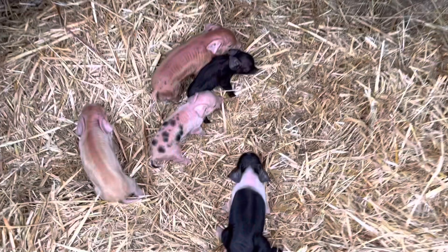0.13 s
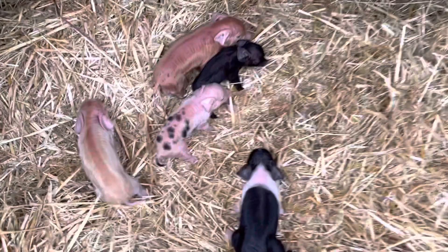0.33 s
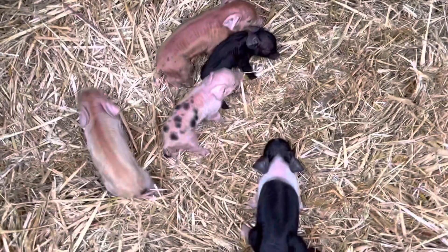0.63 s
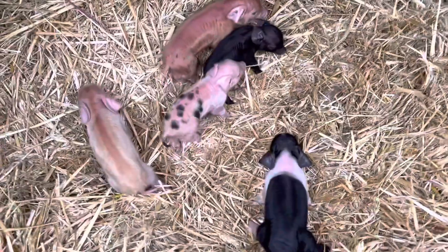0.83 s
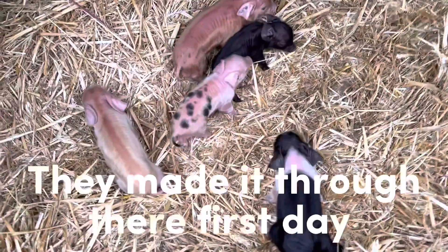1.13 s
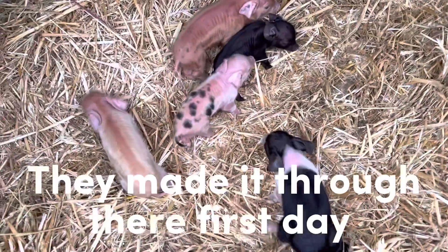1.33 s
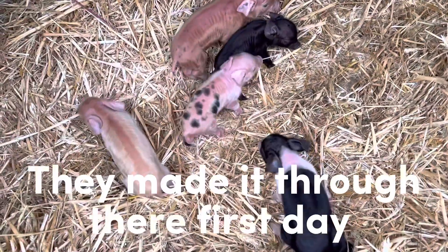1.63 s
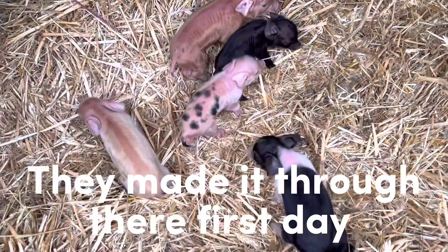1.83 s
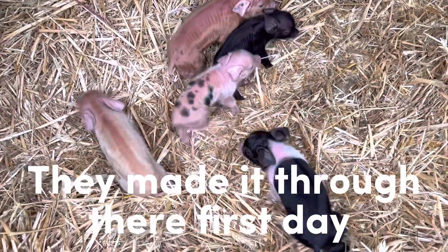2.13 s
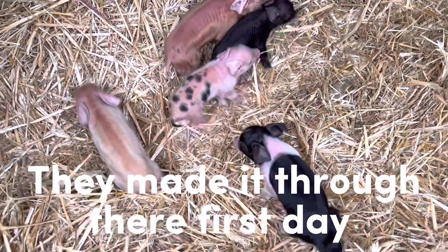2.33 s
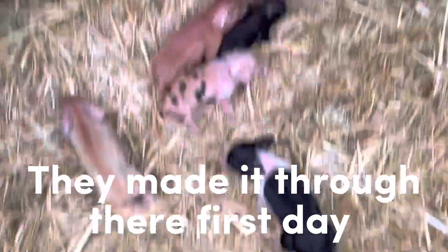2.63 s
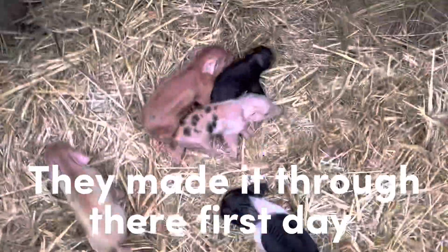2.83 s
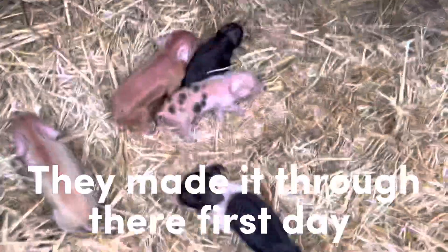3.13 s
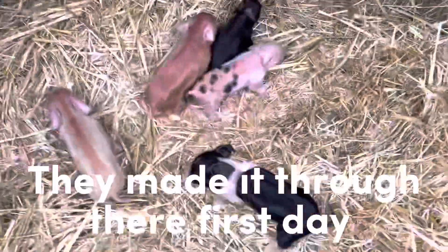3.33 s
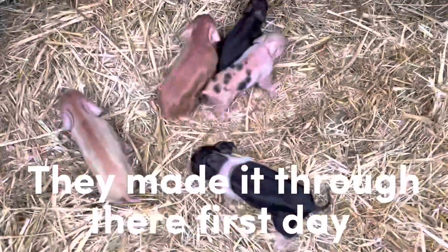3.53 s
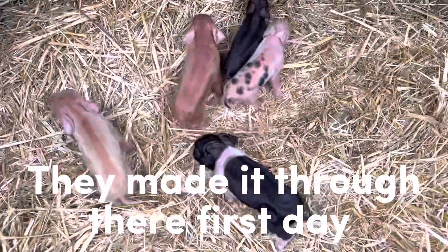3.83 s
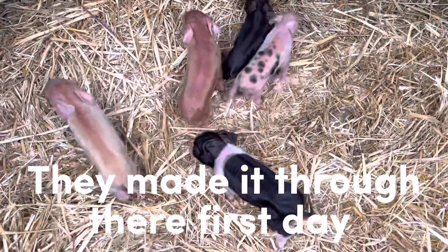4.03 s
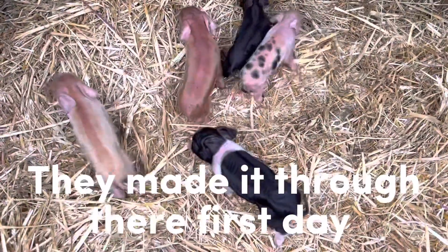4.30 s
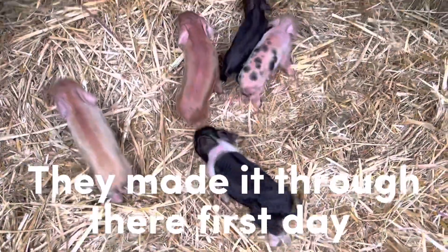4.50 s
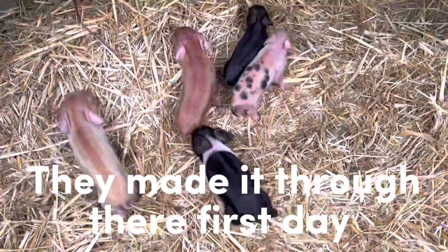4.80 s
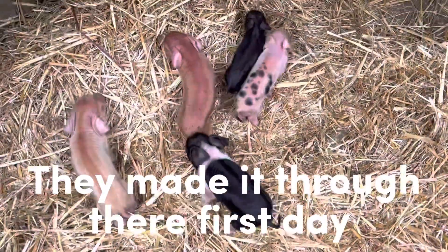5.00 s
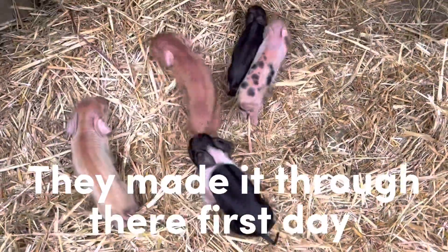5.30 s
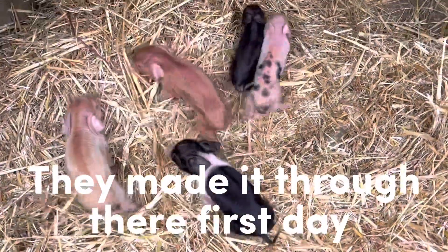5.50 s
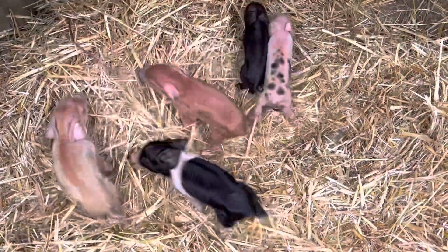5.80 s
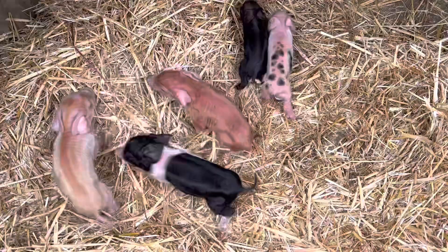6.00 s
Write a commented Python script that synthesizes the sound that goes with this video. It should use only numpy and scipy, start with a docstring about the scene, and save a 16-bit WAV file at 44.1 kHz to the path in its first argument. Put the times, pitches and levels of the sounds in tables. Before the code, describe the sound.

A short faint hiss and rustling straw, then a sow grunts in quick, low, rattling runs close by, with soft piglet hums.

```python
"""A brief thin hiss and softly rustling straw, then a sow grunts in quick runs, close by in a bedded shed. Each
grunt is a short rattle of slow, separate pulses that ring chest, throat, mouth and snout. Shaped noise makes
the breath and straw, narrow puffs the wet flecks of the lips and one straw tick, two harmonics a piglet's hum.
Short feedback echoes are the shed's answer; a two-port microphone hears it all, and the sound cuts out twice."""
import sys
import numpy as np
from scipy import signal
from scipy.fft import rfft, irfft, next_fast_len
from scipy.io import wavfile
from scipy.ndimage import uniform_filter1d

SR = 44100
rng = np.random.default_rng(int(sys.argv[2]) if len(sys.argv) > 2 else 0)


def digitize_waveform(pressure):
    """Quantize a signal to 16-bit integers and store it at the path in sys.argv[1].

    Rows of a 2-D input are taken as channels; values are limited to [-1, 1].
    """
    field = np.atleast_2d(pressure).T
    bounded = np.clip(field, -1, 1)
    quanta = np.round(bounded * 32767).astype(np.int16)
    wavfile.write(sys.argv[1], SR, quanta)


N = 271215
SIZE = next_fast_len(N + SR)
HZ = np.arange(SIZE // 2 + 1) * SR / SIZE + 1e-3   # FFT grid, kept above zero for its logarithm

# The sow's grunts: start_s, opening_db (snout at the first slap), slap_gap_s, length_s,
# swell_db (per slap), bend_per_s (drift of the mouth's resonances, as share), throat_db,
# mouth_hz, mouth_db, palate_hz, palate_db, nose_hz, nose_db, snout_hz, snout_db,
# chest_db, belly_db, breath_db (the last three are peaks of effort)
GRUNT_TABLE = [(0.321, -4.5, 0.026, 0.069, 4, -0.5, -40, 620, -50.5, 874, -36.5, 1133, -43, 2990, -62, -33, -34.5, -35.5),
               (0.563, -3, 0.025, 0.004, -6, 1, -45, 680, -58, 1180, -48, 1510, -66, 3580.0, -78, -42, -41, -66),
               (0.587, -1.5, 0.024, 0.08, 3.5, -0.05, -37, 820, -45, 1136, -34.5, 1940, -56.5, 3090, -58.5, -26, -28.5, -38),
               (0.682, -5, 0.025, 0.0027, 2.0, -1, -47, 860.0, -62, 1090, -51, 2100, -55, 3060, -53, -23.5, -47, -66),
               (0.83, -1.5, 0.025, 0.053, -4.5, 0.5, -43, 506, -54, 876, -47, 1927, -54.5, 2830, -57.5, -30, -37, -58),
               (0.917, -5.5, 0.0245, 0.066, 1.9, -0.64, -25, 860, -27.5, 930, -66, 1925, -57.5, 3090, -52.5, -24, -27, -38),
               (1.134, -5.5, 0.025, 0.0062, 0.0, -1.5, -39.5, 530.0, -68, 1200, -42, 1780, -51.5, 2630, -54, -31.5, -35, -68),
               (1.175, -17, 0.027, 0.11, 3.5, 1, -35, 555, -56.5, 973, -39, 1835, -61.5, 3110, -59, -26.5, -32.5, -36),
               (1.398, -2.5, 0.03, 0.004, 0.0, -1, -48, 910, -40.5, 1260, -34, 1630, -40.5, 2650, -47.5, -26, -36, -47),
               (1.453, -6, 0.027, 0.07, -1, 1.3, -19.5, 880, -36, 910, -27, 1880, -51, 3110, -45.5, -22.5, -32.5, -39.5),
               (1.631, -2, 0.037, 0.031, 1, -3, -24.5, 567, -47, 1120, -61, 1560.0, -68, 2640, -49, -25.5, -33, -73),
               (1.71, 2.5, 0.02, 0.06, 0, 0.5, -23.5, 800, -41, 1060, -38.5, 1860, -46.5, 3020, -48, -23.5, -35.5, -40),
               (1.849, -5, 0.022, 0.041, -18, 1.5, -31, 730, -68, 1350.0, -42, 1710, -45, 2710, -38, -25.5, -27.5, -42.5),
               (1.923, -12, 0.021, 0.078, -5.5, -2.5, -10, 664, -15, 1277, -18, 1580, -45, 3040, -32.5, -23, -37.5, -35),
               (2.167, -10, 0.028, 0.0037, 3, 7.5, -34, 516.0, -44, 1070, -52, 1650, -47, 2730, -45.5, -32.5, -37.5, -48),
               (2.198, -10, 0.029, 0.048, -3.5, 2, -20, 700, -28, 1115, -26.5, 2050, -50, 3290, -32.5, -22.5, -29.5, -39.5),
               (2.329, -6, 0.043, 0.027, 6, -1, -32, 710, -58, 1390, -37, 1500.0, -59, 2670, -34, -27, -28.5, -37.5),
               (2.386, -8, 0.026, 0.047, -4, -0.35, -5.5, 689, -6.5, 1266, -9, 1445, -27, 3050, -29, -25.5, -33, -36.5),
               (2.462, 0, 0.028, 0.0045, 0.0, 0, -21.5, 574, -30, 1220, -39, 1570.0, -55.0, 3040, -43, -31, -31, -42),
               (2.69, -5.5, 0.023, 0.12, -4.5, 2, -39.5, 616, -42, 940.0, -58, 1670, -71, 3180, -48.5, -45.5, -73, -50),
               (2.917, -3, 0.016, 0.057, 2, 14.5, -69, 618, -36.5, 870, -45, 2150, -53, 2780, -56, -45.5, -50.5, -41.5),
               (3.067, 2, 0.023, 0.035, -22, -0.5, -55, 560, -50, 1370, -64.0, 1580, -63, 3530.0, -68, -39.5, -52, -64),
               (3.211, -8, 0.015, 0.017, 8, -0.5, -82, 734, -65, 1210, -60, 1670, -52, 3020, -61.5, -60, -61, -79),
               (3.32, -0.5, 0.018, 0.013, 3, 4, -50, 496, -48, 1020, -42, 1430, -52, 2960, -47, -41.5, -57, -43),
               (3.397, -4.5, 0.027, 0.051, -4.5, -1, -20.5, 963, -26, 984, -24.5, 1970, -49, 3120, -54, -30, -34, -40),
               (3.448, -3, 0.026, 0.049, -8, -1.5, -21, 883, -29, 900, -27, 1670, -51, 3080, -40.5, -23, -29.5, -56),
               (3.666, -22, 0.023, 0.032, 0.5, 1.5, -29, 675, -35.5, 1030, -34, 1450, -37.5, 4070, -49, -30.5, -33.5, -62),
               (3.717, -3.5, 0.029, 0.053, -4.5, -0.5, -20.5, 715, -33.5, 1000, -24, 1316, -34, 3480, -43, -23.5, -30.5, -60),
               (3.849, 1, 0.025, 0.053, -6.5, -0.8, -27.5, 690, -40.5, 890, -36, 1550, -45, 2540.0, -69, -30.5, -33, -46),
               (4.149, -4.5, 0.029, 0.03, -24, -2, -33.5, 684, -38, 1340, -40, 1540, -45.5, 2720, -44, -33.5, -27, -45),
               (4.208, -3, 0.037, 0.058, 3.5, -0.8, -22, 735, -36, 1023, -32, 1880, -51.5, 3230, -48, -27.5, -27, -45),
               (4.267, -4, 0.023, 0.02, -4.5, -0.5, -25, 735, -30, 892, -26.5, 1820, -57, 3100, -35, -27, -27.5, -59),
               (4.478, -2.5, 0.025, 0.024, -19, -2.5, -47.5, 755, -46.5, 1040, -50, 1890, -56, 2500, -47, -29.5, -33.5, -50),
               (4.544, -21, 0.025, 0.068, -5, 0.8, -14.5, 730, -30, 1007, -20.5, 1880, -38, 3180, -29, -22, -28, -38.5),
               (4.752, -5, 0.023, 0.064, -1.5, -0.7, -42.5, 747, -42.5, 950.0, -51, 1645, -56.5, 2530, -60, -50, -52, -52),
               (5.117, -36, 0.027, 0.048, 5, -0.5, -22, 825, -41.5, 1020, -33.5, 2280, -63, 3480, -80, -33.5, -32, -46),
               (5.195, -9.5, 0.02, 0.037, -6, -0.8, -15, 870, -27, 1080, -21.5, 2000, -39.5, 3290, -29, -20.5, -22, -33.5),
               (5.353, -1.5, 0.024, 0.045, -0.5, 0.5, -23, 890, -31, 920, -33.5, 1910.0, -71, 3230, -40, -27, -32, -52),
               (5.502, -6, 0.026, 0.047, 4, 1, -25, 693, -38.5, 1134, -32, 1590, -47.5, 3100, -40, -23, -31.5, -55),
               (5.656, -6, 0.039, 0.0083, 0.0, -3.5, -40, 860, -40, 950, -48, 1660, -42, 2960, -48, -24, -30, -59),
               (5.746, -8.5, 0.018, 0.0049, -2, 0, -72, 905, -35, 1340, -42, 1900, -37, 2800, -32, -47, -36, -40),
               (5.777, -5, 0.039, 0.028, -26, -1, -26.5, 533, -28.5, 1196, -35.5, 1760, -33, 2690, -28.5, -21.5, -28, -37.5),
               (5.849, -3, 0.022, 0.044, -17, -1.5, -20.5, 867, -27, 1150, -29.5, 1750.0, -66, 3700, -45, -27, -30, -50),
               (5.989, -8.5, 0.052, 0.0059, 0.0, -1, -27, 885, -30, 1160, -26, 1740, -31, 2700, -36, -27, -27.5, -46.5),
               (6.044, -12, 0.029, 0.042, -4, 0.7, -21.5, 830, -30.5, 1147, -28, 1936, -39.5, 3170, -35, -21.5, -30, -38)]


def from_db(db):
    """Gain of a level in dB."""
    return 10 ** (np.asarray(db) / 20)


def power_sum(*levels_db):
    """Level of unrelated sounds heard together."""
    return 10 * np.log10(sum(from_db(db) ** 2 for db in levels_db))


def rms_one(x):
    """Scaled to rms 1."""
    return x / np.sqrt(np.mean(x ** 2) + 1e-20)


def in_time(rows):
    """Columns of a curve table, drawn as straight lines through every sample."""
    time_s, *columns = np.transpose(rows)
    return [np.interp(np.arange(N) / SR, time_s, column) for column in columns]


def at_hz(points):
    """A spectrum table on the FFT grid, straight over log frequency."""
    hz, values = np.transpose(points)
    return np.interp(np.log(HZ), np.log(hz), values)


def drift(rate_hz):
    """Slow chance of spread 1: noise through two equal one-pole lowpasses, drawn every 40 samples."""
    r = np.exp(-80 * np.pi * rate_hz / SR)
    noise = rng.standard_normal(N // 40 + 2002)
    slow = signal.lfilter([1], [1, -2 * r, r * r], noise)[2000:]
    return np.interp(np.arange(N) / 40, np.arange(len(slow)), rms_one(slow))


def ring(x, modes):
    """Parallel decaying modes of alternating sign; a unit click rings each at its own level."""
    out = 0
    for k, (hz, width_hz, level_db) in enumerate(modes):
        r, w = np.exp(-np.pi * width_hz / SR), 2 * np.pi * hz / SR
        mode = signal.lfilter([0, np.sin(w)], [1, -2 * r * np.cos(w), r * r], x + 1e-18)
        out = out + (-1) ** k * from_db(level_db) * mode
    return out


def cavity(x, hz, width_hz, level_db):
    """A resonance passed twice: soft onset, dark valleys on both sides."""
    r, w = np.exp(-np.pi * width_hz / SR), 2 * np.pi * hz / SR
    once = ring(x, [(hz, width_hz, level_db)])
    band = [(1 - r * r) / 2, 0, (r * r - 1) / 2]
    return np.e * signal.lfilter(band, [1, -2 * r * np.cos(w), r * r], once)


def at_ports(common, own, colour=1):
    """A common part reaches both ports with a phase lead between them; an own part fills the rest."""
    # phase between the ports: pitch_hz, left_lead_rad
    port_lead = [(0, 0), (340, -.65), (600, -2.1), (860, -2.9), (1400, -3.8), (1700, -.6), (2200, -.4),
                 (3100, -2.9), (3700, -.3), (4500, -.6), (5200, -3), (5600, 0), (7600, 0), (12000, -3.14),
                 (16000, -3.14)]
    # diffuse sound shared by the ports: pitch_hz, common_share (of power)
    port_alike = [(100, .999), (300, .96), (700, .8), (1100, .6), (2000, .45), (3500, .35), (5000, .3),
                  (5700, .998), (7700, .998), (8400, .65), (11300, .6), (12100, .997)]
    # balance of the ports: pitch_hz, left_minus_right_db
    port_tilt = [(230, 3), (380, 0.5), (750, -1), (900, 0.5), (1350, -9), (2000, 1.5), (2600, -2),
                 (4500, 2), (5500, -0.5)]
    lead = np.exp(.5j * np.interp(HZ, *np.transpose(port_lead)))
    both = rfft(common, SIZE) * np.array([lead, 1 / lead])
    alike = np.clip(at_hz(port_alike), 0, 1)
    mix = np.sqrt(alike) * both + np.sqrt(1 - alike) * rfft(own, SIZE)
    balance = from_db(at_hz(port_tilt) * [[.5], [-.5]])
    return irfft(colour * balance * mix, SIZE)[:, :N]


def far_hiss():
    """Noise in one band around four kilohertz, apart at each port: it swells in, then sinks to a trace."""
    # level of the hiss: time_s, level_db
    hiss_curve = [(.04, -98), (.06, -54), (.2, -59), (.3, -72)]
    band = cavity(rng.standard_normal((2, N)), 4280, 1300, 0)
    return from_db(in_time(hiss_curve)[0]) * rms_one(band)


def shed(x):
    """Eight feedback echoes for each of three listening points, duller at every bounce."""
    t60_s, level_db, wall_cut_hz = 0.16, -4.5, 2160   # t60 holds for the lows
    lags_s = rng.uniform(0.0091, 0.033, (3, 8, 1))
    dull = 1 + (HZ / wall_cut_hz) ** 2
    wet = np.zeros((3, len(HZ)), complex)
    for k in range(8):
        lag_s = lags_s[:, k]
        loop = from_db(-60 * lag_s * dull / t60_s) * np.exp(-2j * np.pi * HZ * lag_s)
        wet += (-1) ** k * loop / (1 - loop)
    return from_db(level_db) * irfft(wet * rfft(x, SIZE), SIZE)[:, :N]


def straw(level_db, per_s, cycles):
    """Dry stalks snap and tick at random, each ringing for a few cycles at one of fourteen pitches."""
    sizes = from_db(4.2 * np.minimum(rng.exponential(1, N), 4)) * rng.choice([-1, 1], N)
    born = rng.random(N) < per_s / SR
    dealt = rng.integers(0, 14, N)   # which pitch a stalk gets
    ticks = 0
    for k, hz in enumerate(np.geomspace(3300, 8500, 14)):
        ticks = ticks + ring(sizes * born * (dealt == k), [(hz, hz / cycles, 0)])
    return from_db(level_db) * rms_one(at_ports(ticks, [ticks, -np.roll(ticks, 30)]))


def swishes():
    """Low, rustle and hiss level: each swish of straw rises and falls at a steady rate in dB."""
    # swishes of straw: peak_s, low_db, rustle_db, hiss_db
    swish_rows = np.array([(1.635, -61, -52.5, -58.5), (2.72, -64, -70, -53.5), (2.945, -66, -43, -53.5),
                           (3.56, -43.5, -48.5, -53), (3.816, -48, -44, -52.5), (5.292, -45.5, -46, -47.5),
                           (5.38, -37.5, -63, -47.5), (5.477, -40, -39, -41.5), (5.613, -38, -38, -39.5),
                           (5.769, -62, -48.5, -47.5), (6.0, -54, -46.5, -65)])
    rise_db_per_s, fall_db_per_s = 263, 332
    flat_db = 6   # the top of a swish is flat over this range
    t = np.arange(0, N, 32) / SR
    late_s = t - swish_rows[:, :1]
    slope = np.minimum(rise_db_per_s * late_s, -fall_db_per_s * late_s)
    shape_db = np.minimum(slope + flat_db, 0)
    layers = [power_sum(*(shape_db + peaks_db[:, None]), -120) for peaks_db in swish_rows.T[1:]]
    return [np.interp(np.arange(N) / SR, t, layer_db) for layer_db in layers]


def air_noise(spectrum, level_db, crackle_db, flicker_db, patchy_db):
    """Coloured noise with grains of uneven size; it flickers as a whole and in four bands apart."""
    grains = from_db(crackle_db * np.minimum(rng.exponential(1, N), 6) + flicker_db * drift(11.9))
    white = grains * rng.standard_normal((3, N))
    whole = rfft(at_ports(white[0], white[1:], from_db(at_hz(spectrum))), SIZE)
    centres_hz = np.geomspace(spectrum[1][0], spectrum[-2][0], 4)
    bands = 0
    for one in np.eye(4):
        share = np.interp(np.log(HZ), np.log(centres_hz), one)
        bands = bands + from_db(patchy_db * drift(13.4)) * irfft(whole * share, SIZE)[:, :N]
    return from_db(level_db) * np.sqrt(2) * rms_one(bands)   # level counts both ports' power


def hums():
    """A piglet's soft voice: a smooth swell of two harmonics, sinking a little in pitch."""
    # hums: start_s, length_s, pitch_hz (at mid-hum), level_db
    hum_rows = [(2.704, 0.07, 293.5, -44), (3.061, 0.097, 285, -42), (4.759, 0.1, 295, -46.5)]
    octave_db, sag = -10, 0.091   # second harmonic; share by which the pitch sinks
    out = np.zeros(N)
    for start_s, length_s, hz, level_db in hum_rows:
        share = np.arange(int(length_s * SR)) / (length_s * SR)
        phase = 2 * np.pi * np.cumsum(hz * (1 + sag * (.5 - share))) / SR
        tone = np.sin(phase) + from_db(octave_db) * np.sin(2 * phase)
        at = int(start_s * SR)
        out[at:at + len(share)] += from_db(level_db) * np.sin(np.pi * share) * tone
    return at_ports(out, [out, out])


def flecks():
    """Wet flecks at lips and nostrils, and one sharp tick of straw at 4.43 s: each is a short fading puff of
    noise in a narrow band."""
    # flecks: start_s, peak_db, pitch_hz
    fleck_rows = [(0.3496, -46, 5330), (0.636, -42, 4600), (0.853, -46, 5840), (0.871, -41.5, 5670),
                  (1.151, -50.5, 5900), (1.273, -37.5, 5270), (1.51, -45, 5980), (1.6314, -40, 6600),
                  (3.4234, -38, 5900), (3.751, -37.5, 6580), (3.913, -41.5, 4150), (4.1667, -39.5, 6140),
                  (4.434, -44.5, 7450), (4.5376, -42, 5700), (4.568, -37, 4500), (4.679, -42, 7340),
                  (5.2193, -26.5, 5130), (5.3813, -33.5, 5670), (5.4346, -35.5, 7200),
                  (5.5608, -36.5, 7400), (5.779, -34.5, 5600), (5.9326, -33.5, 8500), (5.9898, -29, 4560),
                  (6.076, -34, 4600), (6.1255, -36, 4220)]
    fade_s, width_hz = 0.01, 680
    out, t = np.zeros(N + SR), np.arange(int(.05 * SR)) / SR
    for start_s, peak_db, hz in fleck_rows:
        puff = cavity(np.exp(-t / fade_s) * rng.standard_normal(len(t)), hz, width_hz, 0)
        at = int(start_s * SR)
        out[at:at + len(t)] += from_db(peak_db) * puff / np.abs(puff).max()
    return at_ports(out[:N], [out[:N], -out[:N]])


def effort(peaks_db, swell):
    """Level that swells with each grunt around its peak and then falls away at a steady rate in dB."""
    attack_s, under_db, share, lag_s, fall, rest_db = swell
    t = np.arange(0, N, 32) / SR
    power = from_db(rest_db) ** 2
    for (start_s, _, _, length_s, *_), peak_db in zip(GRUNT_TABLE, peaks_db):
        peak_s = start_s + max(share * length_s + lag_s, .002)
        # a negative attack holds the layer back until after the grunt's start
        times_s = [start_s - attack_s, start_s, peak_s, peak_s + 1]
        shape_db = np.interp(t, times_s, [-40, -under_db, 0, -fall], left=-200)
        power = power + from_db(peak_db + shape_db) ** 2
    return np.interp(np.arange(N) / SR, t, 10 * np.log10(power))


def chest(slaps, murmur):
    """Slaps and a steady turbulence set the chest and belly modes booming; effort sets the level."""
    # body modes, chest then belly: pitch_hz, width_hz, relative_db
    chest_modes = [(54, 8.2, -2), (85.5, 20.2, 7), (102.4, 9.8, -5)]
    belly_modes = [(131.6, 7.2, 1.5), (181.5, 17.6, -1)]
    # swell of effort: attack_s, first_slap_db (under the peak), peak_share (of the length),
    # lag_s, fall_db_per_s, rest_db
    chest_swell = (0.06, 9, 0.88, -0.004, 310, -61)
    belly_swell = (0, 6.5, 1.42, -0.0045, 225, -71)
    chest_db, belly_db = np.transpose(GRUNT_TABLE)[-3:-1]
    levels_db = effort(chest_db, chest_swell), effort(belly_db, belly_swell)
    out, drive = 0, slaps + murmur * rng.standard_normal(N)
    window = int(0.02 * SR)
    for modes, level_db in zip((chest_modes, belly_modes), levels_db):
        # the body wall passes only the lows
        boom = ring(ring(drive, modes), [(modes[0][0] * 1.277, 60, 0)])
        power = uniform_filter1d(uniform_filter1d(boom ** 2, window), window)
        out = out + from_db(level_db) * boom / np.sqrt(power + 1e-12)   # evened out, then levelled
    return out


LEAK_S = .015   # room ahead of the first slap


def rattle(gap_s, length_s, swell_db, chance, rough, puff_s, jitter_s, flutter_s):
    """Wet vocal folds slap shut at slow, uneven intervals, flutter twice and let out a noisy puff."""
    span, k = int(.22 * SR), np.arange(5)
    jitter = jitter_s * np.sqrt(k) * np.clip(chance[0, k], -2, 2)
    when_s = LEAK_S + k * np.clip(gap_s, .01, .045) + jitter
    lasting = np.clip((length_s + LEAK_S - when_s) / 0.0059 + 1, 0, 1)   # slaps end with the grunt
    size = from_db(swell_db * k + 2.0 * chance[1, k]) * lasting   # 2 dB of chance per slap
    slaps, flutter = np.zeros((2, span))
    slaps[(when_s * SR).astype(int)] = size
    for late, strength in (chance[2:4, k], chance[4:6, k]):
        flutter_at = when_s + flutter_s * (.3 + np.abs(late))
        flutter[(flutter_at * SR).astype(int)] += .35 * size * strength
    fade, rise = np.exp(-1 / (puff_s * SR)), np.exp(-1 / (0.0034 * SR))
    fading = signal.lfilter([1], [1, -fade], slaps)
    puff = signal.lfilter([1 - rise], [1, -rise], fading)
    # air leaks through just before the first slap
    early_s = np.arange(span) / SR - LEAK_S
    leak_db, leak_rise_s = -9, .005
    leak = np.exp(np.minimum(early_s, 0) / leak_rise_s) * (early_s < .002)
    puff += from_db(leak_db) * size[0] * leak
    return slaps + flutter + rough * puff * rng.standard_normal(span)


def grunts():
    """Rattles ring the cavities of the vocal tract; the bare slaps come back too, to shake the chest."""
    # throat modes: pitch_hz, width_hz, relative_db (to the grunt's throat level)
    throat_modes = [(254.5, 71, -19), (314.6, 65.8, -4.5), (404.5, 66.7, -13.5)]
    # nostril modes: pitch_ratio (to the snout), width_hz, relative_db (to the snout)
    nostril_modes = [(1.54, 240, -10), (2.06, 400, -12.5), (2.6, 300, -18.5)]
    # mouth, palate, nose, snout: width_hz
    tract_widths_hz = [108, 113.5, 120.5, 161]
    # mouth, palate, nose, snout: detuning of the twin passage, as share
    twin_spread = [.08, .07, .06, .08]
    # short weak grunts are breathy: wider resonances, more air
    breathy_under_s, breathy_under_db, wider, rougher = .04, -26, 2.2, 1.5
    voice, slaps = np.zeros(N + SR), np.zeros(N + SR)
    for start_s, opening_db, gap_s, length_s, swell_db, bend, throat_db, *tract in np.array(GRUNT_TABLE)[:, :-3]:
        breathy = (length_s < breathy_under_s) * np.clip((breathy_under_db - throat_db) / 6, 0, 1)
        # three rattles share their timing but differ in strength, flutter and air
        timing, rattles = rng.standard_normal((1, 8)), []
        for rough in (.04, .06, .07):
            chance = np.vstack([timing, rng.standard_normal((5, 8))])
            rattles.append(rattle(gap_s, length_s, swell_db, chance, rough=rough * (1 + rougher * breathy),
                                  puff_s=.012, jitter_s=.0011, flutter_s=.004))
        low, mid, high = rattles
        hz, level_db = np.array(tract[::2]), np.array(tract[1::2])
        widths_hz = np.array(tract_widths_hz) * (1 + wider * breathy)
        t = np.arange(len(low)) / SR - LEAK_S
        # the snout opens for the second slap
        still_shut = np.clip(1 - (np.maximum(t, 0) / gap_s) ** 6, 0, 1)
        opening = from_db(opening_db * still_shut)
        half = np.sqrt(opening)
        throat = sum(cavity(opening ** 0.32 * low, f, width, throat_db + db)
                     for f, width, db in throat_modes)
        # turbulence differs along the tract; detuned twin passages make each resonance wander
        twin_hz = hz * (1 + rng.choice([-1, 1], 4) * rng.uniform(.7, 1.3, 4) * twin_spread)
        main_air = half * mid, -half * low, opening * high, -opening * high
        twin_air = half * high, half * mid, opening * low, opening * mid
        main = list(map(cavity, main_air, hz, widths_hz, level_db))
        twin = list(map(cavity, twin_air, twin_hz, widths_hz, level_db - 5.5))
        cheeks = cavity(half * high, np.sqrt(hz[0] * hz[1]), 350, level_db[:2].mean() - 4.5)
        mouth = sum(main[:2] + twin[:2]) + cheeks
        lip_crack = cavity(opening * mid, np.sqrt(hz[2] * hz[3]), 1600, level_db[2:].mean() + 2.5)
        snout = sum(main[2:] + twin[2:]) + lip_crack
        for air, (ratio, width, db) in zip((mid, low, high), nostril_modes):
            nostril_hz = hz[-1] * (ratio + rng.normal(0, 0.038))
            snout += cavity(opening * air, nostril_hz, width, level_db[-1] + db + rng.normal(0, 3.2))
        # the moving jaw bends the mouth's resonances: its sound is read ever faster or slower
        bent = np.interp(t + bend * np.maximum(t, 0) ** 2 / 2, t, mouth, right=0)
        at = int((start_s - LEAK_S) * SR)
        voice[at:at + len(low)] += throat + bent + snout
        slaps[at:at + len(low)] += low
    return voice[:N], slaps[:N]


def scene():
    """Straw, breath, piglet and sow at the two ports."""
    # noise colours of low snort, rustle and fine hiss: pitch_hz, relative_db (per Hz)
    snort_colour = [(150, -3), (250, 2.5), (330, -6), (600, -1.5), (1200, -12.5), (1700, -33), (2400, -49)]
    rustle_colour = [(900, 7), (1600, -3), (2300, -4), (3200, -3), (4300, -2.5), (5200, -8), (6200, -83)]
    hiss_colour = [(4000, -6.5), (5600, -1.5), (7000, -3), (9000, -4.5), (12000, -0.5), (15600, -9.5)]
    # shuffling in the bedding: time_s, low_db, rustle_db, hiss_db
    bedding = [(0.0, -95, -55.5, -72), (0.26, -59.5, -58.5, -63.5), (0.43, -85, -69, -67.5),
               (0.87, -43.5, -62.5, -63.5), (1.22, -58.5, -65, -71), (1.4, -44.5, -65, -60),
               (1.93, -46, -68, -61.5), (2.26, -47, -50, -52.5), (2.35, -59, -51, -53.5),
               (2.55, -57.5, -55.5, -55), (3.24, -80, -62, -54.5), (3.34, -79, -55, -52),
               (3.58, -42, -51.5, -50), (3.73, -56, -53, -52), (3.89, -48.5, -57.5, -53.5),
               (4.47, -57.5, -65.5, -59.5), (4.69, -62, -60, -52), (4.85, -82, -71, -56.5),
               (5.17, -58, -61.5, -57.5), (5.29, -60, -56, -61), (5.38, -48, -66, -48),
               (5.52, -51, -63, -48.5), (5.87, -52, -56, -47.5), (6.15, -63, -57, -42)]
    # swell of the breath: attack_s, first_slap_db (under the peak), peak_share (of the length),
    # lag_s, fall_db_per_s, rest_db
    breath_swell = (-0.03, 13.5, 0.83, 0.0083, 211, -88)
    voice, slaps = grunts()
    wet = shed(voice)
    sow = at_ports(voice + wet[0], from_db(-4.0) * voice + wet[1:]) + chest(slaps, murmur=0.03)
    breath_db = effort(np.transpose(GRUNT_TABLE)[-1], breath_swell)
    breath_layers_db = breath_db, breath_db - 13.5, breath_db - 20   # weaker in the brighter layers
    snort_db, rustle_db, hiss_db = map(power_sum, in_time(bedding), swishes(), breath_layers_db)
    snort = air_noise(snort_colour, snort_db, crackle_db=1.5, flicker_db=4.0, patchy_db=4.0)
    rustle = air_noise(rustle_colour, rustle_db, crackle_db=1.5, flicker_db=0.1, patchy_db=4.5)
    hiss = air_noise(hiss_colour, hiss_db, crackle_db=3.5, flicker_db=.9, patchy_db=2.5)
    stalks = straw(rustle_db - 23.0, per_s=4300, cycles=45)
    return sow + snort + rustle + hiss + hums() + stalks + far_hiss() + flecks()


def record(dry):
    """Rumble filter, rounded peaks, two short dropouts; the top is cut."""
    # moments when the sound cuts out: start_s, end_s
    dropouts = [(2.0745, 2.0925), (2.1172, 2.1380)]
    rumble_cut_hz, ceiling, top_cut_hz = 38, .95, 16100
    dry = signal.sosfilt(signal.butter(3, rumble_cut_hz, "high", fs=SR, output="sos"), dry)
    t, on = np.arange(N) / SR, np.ones(N)
    for start_s, end_s in dropouts:
        on *= np.clip(np.maximum(start_s - t, t - end_s) / .0008, 0, 1)   # 0.8 ms fades
    rounded = dry / (1 + (np.abs(dry) / ceiling) ** 4) ** .25
    return signal.sosfilt(signal.cheby2(24, 70, top_cut_hz, fs=SR, output="sos"), rounded * on)


dry = scene()
out = record(dry)
digitize_waveform(out)
```